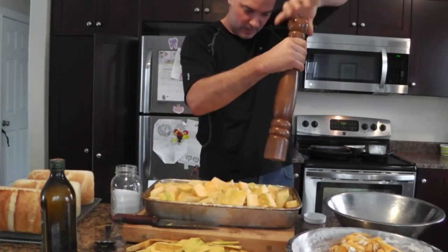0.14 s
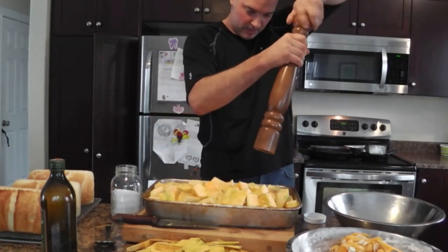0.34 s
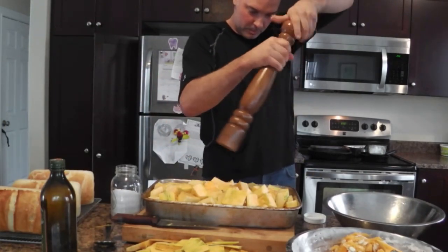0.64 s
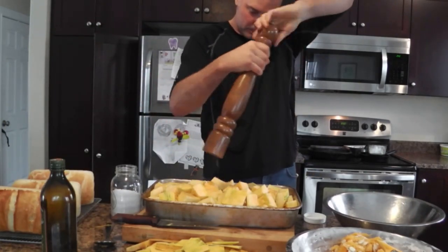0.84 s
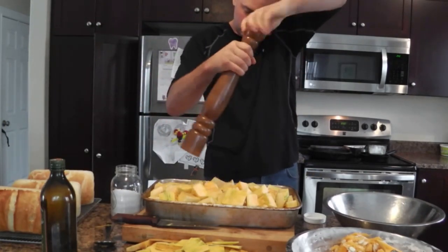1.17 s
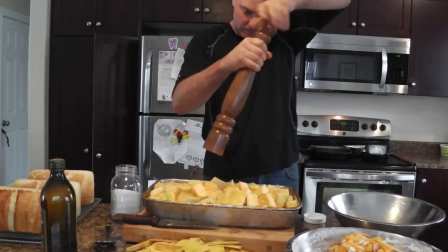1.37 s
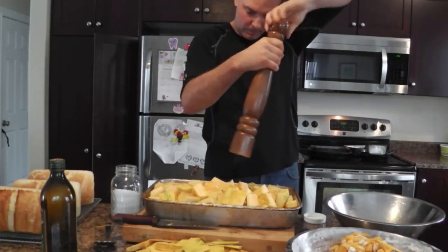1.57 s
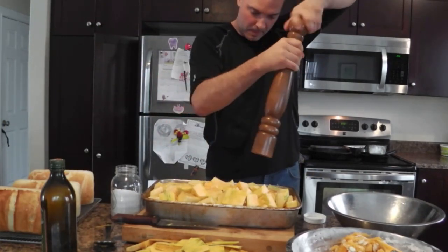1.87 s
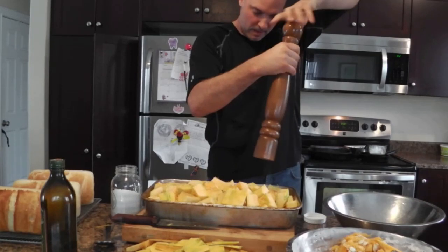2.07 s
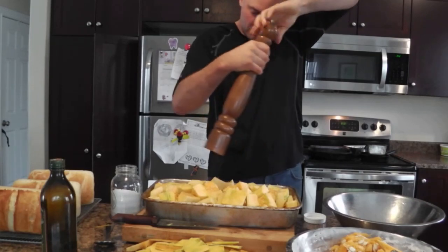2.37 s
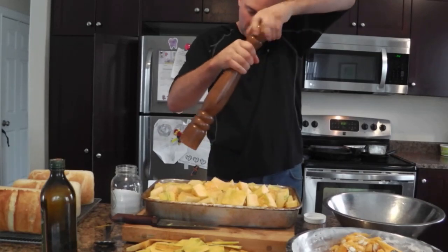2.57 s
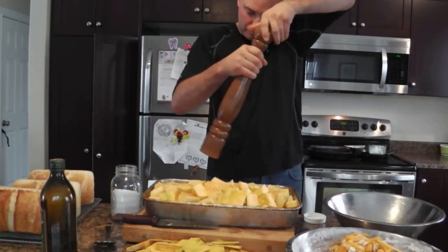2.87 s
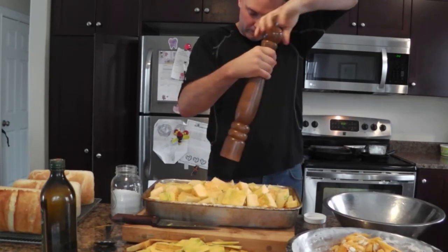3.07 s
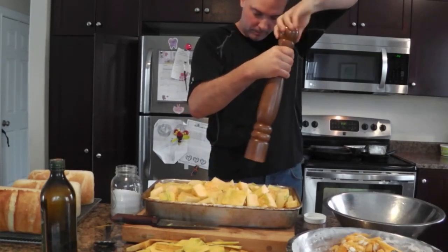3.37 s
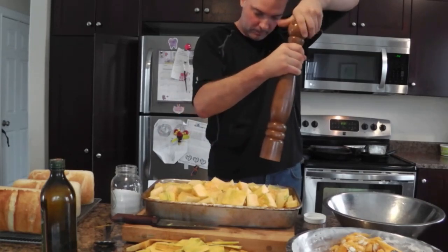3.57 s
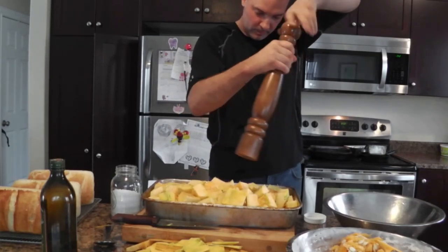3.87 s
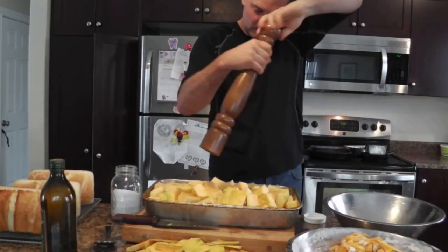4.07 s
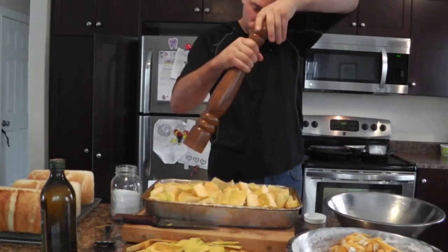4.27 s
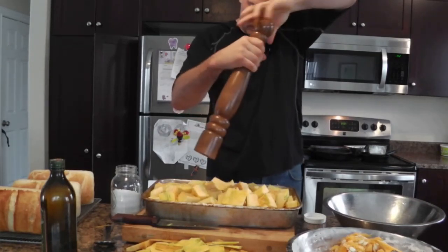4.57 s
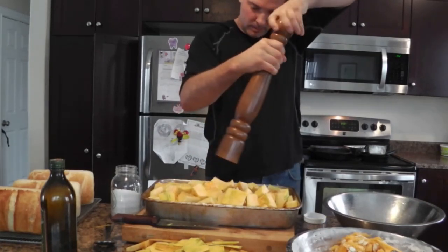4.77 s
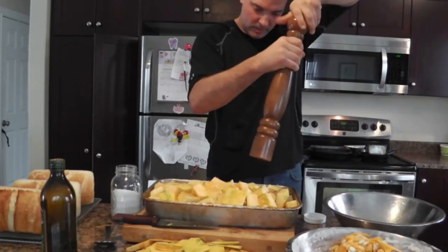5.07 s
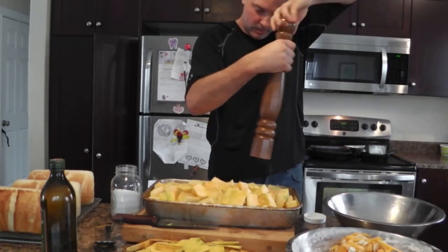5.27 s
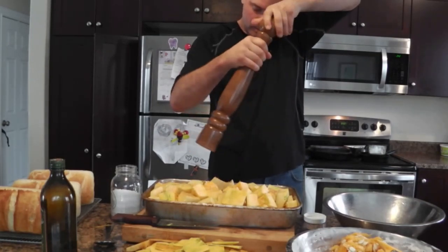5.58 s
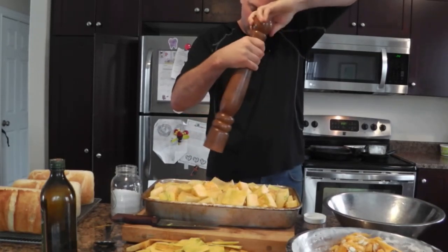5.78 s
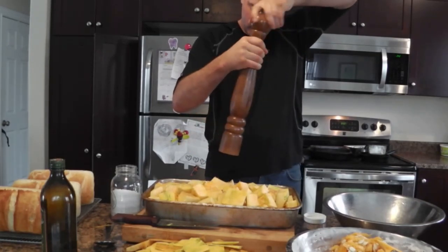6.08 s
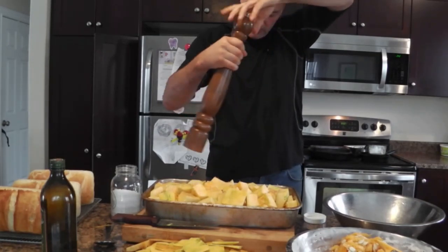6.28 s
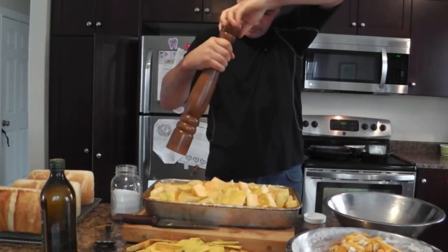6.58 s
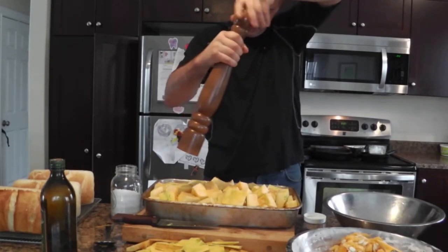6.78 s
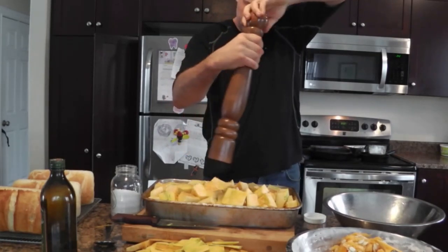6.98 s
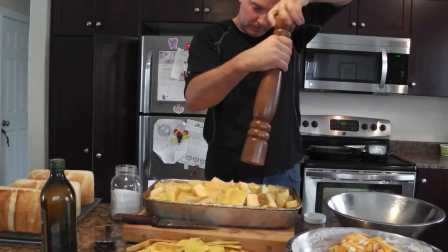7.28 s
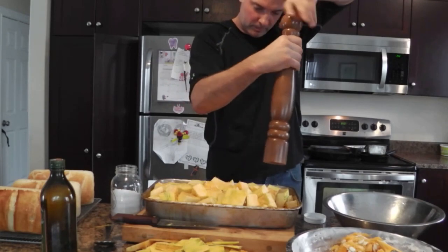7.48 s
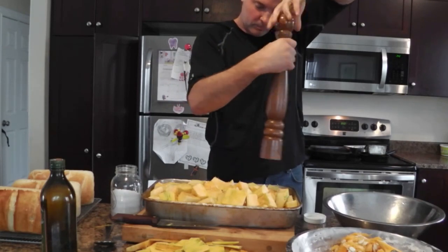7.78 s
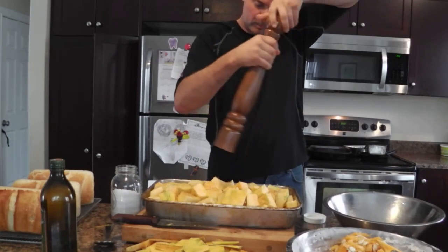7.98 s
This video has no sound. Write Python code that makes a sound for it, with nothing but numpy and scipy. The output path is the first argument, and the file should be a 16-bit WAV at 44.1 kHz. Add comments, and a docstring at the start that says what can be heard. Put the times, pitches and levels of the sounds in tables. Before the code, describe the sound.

For about eight seconds a tall wooden pepper mill is twisted by hand in a hard-surfaced kitchen. A twist begins at once, then others follow roughly every 0.35 to 0.4 seconds. Each opens with a faint scrape and soft knock, builds for under a tenth of a second into dense, gritty crunching coloured by the hollow barrel, then cuts off into a bright, smooth room ring. The first 2.7 seconds are strongest; around 2.9 to 4 the grinding softens, firms again at 4.7 to 5.1, weakens most near 6, then partly recovers. Sharp cracks and tiny high husk pings punctuate the twists. Dry knob creaks tick near 0.6, 1.3, 3.8, 4.9 and 7.4, with knocks around 0.6, 4.3 and 7.5. Loose corns rattle faintly. Quiet air and wavering low hum continue underneath, with a slight rumble swell near 4.8. The last twist starts just before the end.

```python
"""In a hard-walled kitchen a tall wooden pepper mill is twisted by hand, nearly three twists a second.
Each twist is a dense crunch of tiny random fractures, with sharp cracks, all ringing in the wooden barrel.
Splitting husks ping, the knob creaks in runs of dry ticks and knocks now and then, and loose corns rattle.
Decaying noise tails make the room ring on between twists, over a low appliance hum, air and rumble."""
import sys
import numpy as np
from scipy import signal
from scipy.fft import rfft, irfft, next_fast_len
from scipy.io import wavfile
from scipy.ndimage import uniform_filter1d, map_coordinates

SR = 44100
rng = np.random.default_rng(int(sys.argv[2]) if len(sys.argv) > 2 else 0)


def unload_wav(signal):
    """Save mono or channel-first audio to the path in sys.argv[1] as 16-bit WAV at rate SR, clipped to [-1, 1]."""
    wavfile.write(
        sys.argv[1],
        SR,
        np.round(np.clip(np.atleast_2d(signal).T, -1, 1) * 32767).astype(np.int16),
    )


N = 358533
TIME = np.arange(N) / SR  # s


def amp(db):
    """Decibels to gain."""
    return 10 ** (np.asarray(db) / 20)


def unit(x):
    """Scaled to rms 1."""
    return x / np.sqrt(np.mean(x ** 2) + 1e-20)


def along(points, hz):
    """(Hz, value) points read on a log frequency axis."""
    point_hz, value = np.transpose(points)
    return np.interp(np.log(hz + 1), np.log(point_hz), value)


def wobble(rate):
    """A smooth random curve, rate knots a second."""
    knots = rng.standard_normal(int(N * rate / SR) + 4)
    return map_coordinates(knots, [TIME * rate], order=2)


def filtered(x, response):
    """x times a gain that depends on frequency."""
    size = next_fast_len(x.shape[-1] + 4096)
    gain = response(np.fft.rfftfreq(size, 1 / SR))
    return irfft(rfft(x, size) * gain, size)[..., :x.shape[-1]]


def add(track, s, sound):
    """Mix a sound into a track from time s on."""
    part = track[..., max(round(s * SR), 0):][..., :sound.shape[-1]]
    part += sound[..., :part.shape[-1]]


def fractures(count, rate, spread_db):
    """Randomly timed impulses of very unequal size, rate a second."""
    chance, size = rng.random(count), rng.standard_normal(count)
    sign = rng.choice([-1, 1], count)
    return (chance < rate / SR) * sign * amp(spread_db * np.clip(size, -2, 2))


def burst(life, attack):
    """A gritty force of rms 1 without pitch: life is its 60 dB decay (s), attack its onset (s)."""
    t = TIME[:SR // 40]
    force = amp(-60 * t / life) * (1 - np.exp(-t / attack))
    spectrum = rfft(force * rng.standard_normal(len(t)), 2 * len(t))
    even = irfft(np.exp(1j * np.angle(spectrum)))[:len(t)]  # keep the phases, flatten the spectrum
    return unit(even)


# broad colour of a breaking corn heard through the mill: freq_hz, relative_level_db
CRUNCH_COLOUR = [(60, -44.5), (200, -24.5), (330, -14), (600, -13), (900, -7), (1300, -2.5), (1750, -6),
                 (2300, -3), (3000, -11.5), (5600, -14.5), (7000, -22), (9200, -28), (10800, -38.5),
                 (15500, -48.5)]
# resonances of barrel and burr: freq_hz, width_hz, peak_db (over the broad colour)
BARREL_MODES = [(500, 10, 6.5), (1120, 113, 6), (1260, 240, 2.5), (1460, 150, 2), (2148, 175, 5.5),
                (2295, 210, 2.5), (2485, 77, 9), (3680, 360, 3), (5310, 400, 4)]


def mill_ring(boom_db, crisp_db, boom_hz=1700, crisp_hz=2900, size=2048):
    """The mill's answer to one tiny fracture; the grip shifts its resonances a little each time."""
    hz = np.fft.rfftfreq(size, 1 / SR)
    grip = 1 + .009 * rng.standard_normal(len(BARREL_MODES))
    db = along(CRUNCH_COLOUR, hz)
    for (mode_hz, width_hz, peak_db), shift in zip(BARREL_MODES, grip):
        db = db + peak_db / (1 + (2 * (hz - mode_hz * shift) / width_hz) ** 2)
    boom = boom_db / (1 + (hz / boom_hz) ** 8)  # below boom_hz
    crisp = crisp_db * (1 - 1 / (1 + (hz / crisp_hz) ** 8))  # above crisp_hz
    gain = unit(amp(db)) * amp(boom + crisp)
    # minimum phase: the ring starts at once
    cepstrum = irfft(np.log(gain + 1e-6))
    causal = np.r_[1, np.full(size // 2 - 1, 2), np.zeros(size // 2)]
    return irfft(np.exp(rfft(cepstrum * causal)))


BITE_BOOM_DB, BITE_CRISP_DB = 5.5, 4.5  # colour of the first bite
CREST_BOOM_DB, CREST_CRISP_DB = -1.5, -1.5  # colour under full pressure
EASE_S, EASE_DB = .055, -9.5  # after its crest every twist eases off for so long, by so much
RELEASE_DB_PER_S, GRIP_S = 1100, 0.0058  # how fast the burr stops, and how fast it grips
# lesser corns that split during a twist: rate per second, level against the grind, crispness
SPLIT_RATE, SPLIT_DB, SPLIT_CRISP_DB = 45, -5.5, 5
# twists of the knob, levels before the mix: start_s, rise_s (to the crest), crest_db,
# bite_db (first bite against the crest), knock_db (burr catching, before its trim), boom_db, crisp_db
TWISTS = [(0.0, 0.0058, -19.5, -10, -8.5, -3.5, -5), (.32, 0.076, -20.5, -8.5, -34, .5, -5),
          (.695, 0.071, -20.5, -16.5, -18.5, -3, 0.5), (1.102, 0.07, -19, -9.5, -17, 1.5, -1),
          (1.465, 0.074, -18.5, -19.5, -19.5, 0, -3.5), (1.835, 0.074, -19.5, -13, -24, -2, -1),
          (2.217, 0.089, -23, -3, -18, -2, -4.5), (2.565, 0.049, -20.5, -15, -15, 1.5, -3.5),
          (2.904, 0.077, -26.5, -1, -18, 0, -2.5), (3.262, 0.084, -26.5, -8.5, -19.5, -2, 0),
          (3.627, 0.062, -27, -5, -24.5, 2.5, -1), (3.976, 0.059, -24.5, -2, -19, 0.5, 2.5),
          (4.369, 0.077, -23.5, -8, -19.5, -2, -2.5), (4.745, 0.11, -20.5, -5.5, -24, -2, -2),
          (5.117, .11, -20.5, -6, -17.5, -2.5, -2.5), (5.629, 0.083, -27.5, -6, -25, 3, -1),
          (6.069, .055, -32, -5, -17, -2, 1), (6.47, 0.088, -25, -11, -42, 1.5, -1.5),
          (6.865, 0.063, -23, -8.5, -16.5, -3.5, -1.5), (7.23, 0.076, -24, -5, -26.5, -1.5, -2),
          (7.59, 0.056, -22.5, -6.5, -25, -1, -3.5), (8.085, 0.021, -29, 4.5, -22.5, 0, 3.5)]


def grinding(clump_db=4):
    """The burr bites, builds to a crest and eases off; corns give way in clumps of tiny fractures."""
    out, t = np.zeros(N), TIME[:SR // 3]
    clumps = amp(clump_db * wobble(190))
    for s, rise, crest_db, bite_db, _, boom_db, crisp_db in TWISTS:
        effort_db = np.interp(t, [0, rise, rise + EASE_S], [bite_db, 0, EASE_DB])
        effort_db -= RELEASE_DB_PER_S * np.maximum(t - rise - EASE_S, 0)
        effort = amp(crest_db + effort_db) * (1 - np.exp(-t / GRIP_S))
        pressure = np.minimum(t / rise, 1)
        grains = fractures(count=len(t), rate=1600, spread_db=5.0)
        grains *= np.roll(clumps, -round(s * SR))[:len(t)]
        # even out the grains' running level, so the effort sets each twist's loudness
        running_power = np.abs(uniform_filter1d(grains ** 2, size=SR // 30))
        grains /= np.sqrt(running_power + 1e-9)
        split_times = fractures(count=len(t), rate=SPLIT_RATE, spread_db=2)
        splits = unit(signal.fftconvolve(split_times, burst(life=0.0029, attack=0.00043))[:len(t)])
        # the woody bite fades into the crest's crunch as the pressure grows
        bite_ring = mill_ring(boom_db + BITE_BOOM_DB, crisp_db + BITE_CRISP_DB)
        crest_ring = mill_ring(boom_db + CREST_BOOM_DB, crisp_db + CREST_CRISP_DB)
        split_ring = mill_ring(boom_db + CREST_BOOM_DB, crisp_db + SPLIT_CRISP_DB)
        woody = signal.fftconvolve((1 - pressure) * effort * grains, bite_ring)
        crunch = signal.fftconvolve(pressure * effort * grains, crest_ring)
        crackle = signal.fftconvolve(pressure * effort * splits, split_ring)
        add(out, s, woody + crunch + amp(SPLIT_DB) * crackle)
    return out


LEAD_S, LEAD_DB = .012, -5  # slack taken up before a twist: time, level against the first bite
CATCH_BOOM_DB, CATCH_CRISP_DB = 3.5, -3.5  # colour of the knock that opens a twist


def catching():
    """Each twist opens with a faint scrape of slack, then a soft woody knock of burr against corns."""
    out, t = np.zeros(N), TIME[:SR // 30]
    for s, _, crest_db, bite_db, knock_db, boom_db, _ in TWISTS:
        scrape = rng.standard_normal(len(t)) * np.interp(t, [0, LEAD_S, 2 * LEAD_S], [0, 1, 0])
        scrape = signal.fftconvolve(scrape, mill_ring(BITE_BOOM_DB, BITE_CRISP_DB))
        add(out, s - LEAD_S, amp(crest_db + bite_db + LEAD_DB) * scrape)
        knock = burst(life=0.017, attack=0.0016)
        knock = signal.fftconvolve(knock, mill_ring(boom_db + CATCH_BOOM_DB, CATCH_CRISP_DB))
        add(out, s, amp(knock_db - 10.5) * knock)
    return out


# whole corns that split: start_s, level_db (before the trim), boom_db, crisp_db
CRACKS = [(.013, -10.5, 2, 3), (0.738, -16.5, 3, 3), (.741, -9, 0, -11), (1.124, -11, -3.5, 0),
          (1.156, -13, -4, 7.5), (1.171, -8, -16, -4.5), (1.504, -25, -30, 13), (1.859, -22, 8, 10),
          (1.88, -13.5, -1, 1), (1.974, -17, -1, 5.5), (2.279, -26.5, 7, 13), (2.566, -10.5, -17, -3),
          (2.577, -10.5, 0, 0.5), (2.98, -15, 0, 9), (3.297, -12, -1, 5.5), (3.313, -16.5, 3.5, 2.5),
          (3.705, -8.5, -15, -16), (4.022, -10, -4, -8), (4.41, -18, 4, 5), (4.746, -28, 11, 14.5),
          (4.817, -14.5, -10, 6.5), (5.216, -15, -7, 3), (5.643, -14.5, -2.5, -8), (6.084, -15.5, -8, -7),
          (6.122, -25, 5.5, 7), (6.865, -16, 2.5, 2.5), (6.936, -17.5, 3, -12), (7.653, -11.5, -3, 4),
          (7.666, -14, 0.5, 8)]
# the slack knob knocks between twists: start_s, level_db (before the trim), boom_db, crisp_db
KNOCKS = [(.625, -27, -0.5, -9), (4.322, -39, 1, 7), (7.511, -20, -8.5, -10.5)]


def striking(blows):
    """A splitting corn or a knock of the knob is a burst of a few milliseconds that rings the barrel."""
    out = np.zeros(N)
    for s, db, boom_db, crisp_db in blows:
        blow = burst(life=0.012, attack=0.0011)
        add(out, s, amp(db) * signal.fftconvolve(blow, mill_ring(boom_db, crisp_db)))
    return amp(-9.0) * out


SNAP_HZ, SNAP_SCATTER = 4820, 0.057  # a husk's ping: centre pitch, its spread as a log ratio
SNAP_DB = -5.5  # trim on level plus crispness of the crack
SNAP_COLOUR = [(200, -32), (1000, -31), (3000, -2.5), (5500, -0.5), (7000, -22), (14000, -22)]  # Hz, dB


def snapping(life=0.0083, attack=0.00038, grit=1.0):
    """A snapping husk flicks a steel tooth: a short gritty ping from the mill's open mouth, one a crack."""
    out, t = np.zeros(N), TIME[:SR // 80]
    for s, db, _, crisp_db in CRACKS:
        hz = SNAP_HZ * np.exp(SNAP_SCATTER * rng.standard_normal())
        jitter = np.cumsum(0.22 * rng.standard_normal(len(t)))  # rad
        ping = np.sin(2 * np.pi * hz * t + jitter)
        envelope = amp(db + crisp_db - 60 * t / life) * (1 - np.exp(-t / attack))
        add(out, s, envelope * (ping + grit * rng.standard_normal(len(t))))
    return amp(SNAP_DB) * filtered(out, lambda hz: amp(along(SNAP_COLOUR, hz)))


# the knob creaks on its seat as the hand regrips: start_s, length_s, level_db (before the trim)
CREAKS = [(.577, 0.11, -36), (1.301, .094, -37), (3.77, 0.12, -39), (4.131, .21, -39), (4.87, 0.17, -31.5),
          (7.37, 0.078, -33.5), (7.52, .03, -28), (7.878, 0.15, -41)]


def creaking(slips=130, spread_db=5.0, creak_hz=2400, life=0.0077, fade_db=7):
    """Wood sticks and slips on wood: uneven, fading dry ticks, about slips a second, near creak_hz."""
    out, t = np.zeros(N), TIME[:SR // 80]
    envelope = amp(-60 * t / life) * (1 - np.exp(-t / 0.00093))
    for start, length, db in CREAKS:
        gaps = rng.uniform(.4, 1.6, 60)
        sizes, pitches = rng.standard_normal(60), rng.standard_normal(60)
        ages = (np.cumsum(gaps) - gaps[0]) / slips
        for age, size, pitch in zip(ages, sizes, pitches):
            if age < length:
                tick = np.sin(2 * np.pi * creak_hz * (1 + 0.051 * pitch) * t) * envelope
                tick_db = db + spread_db * size - fade_db * age / length
                add(out, start + age, amp(tick_db) * tick)
    return amp(14.0) * out


def rattling():
    """Loose corns and the slack knob tick against the barrel, louder around the harder twists."""
    start, _, crest_db, *_ = np.transpose(TWISTS)
    ticks = fractures(count=N, rate=58, spread_db=5) * amp(np.interp(TIME, start, crest_db))
    return amp(-55.5) * unit(signal.fftconvolve(ticks, mill_ring(boom_db=-1.0, crisp_db=2.0))[:N])


def counter(x, count=6):
    """The direct sound and its first bounces off the counter and the dishes."""
    paths = np.zeros((2, SR // 40))
    paths[:, 0] = 1
    delays = rng.uniform(.002, .016, count)  # s
    for delay, sign in zip(delays, rng.choice([-1, 1], count)):
        paths[:, round(delay * SR)] += sign * amp(-12.0)
    return signal.oaconvolve(x[None], paths, axes=1)[:, :N]


# diffuse sound at the close microphone pair: freq_hz, side_gain_db
WIDTH = [(100, -6.5), (380, -9), (700, -15), (1300, -17.5), (2400, -10), (4400, -4), (8000, 1.5),
         (15000, 3.5)]


def stereo(mid, side):
    """Diffuse sound at the microphone pair: alike in the middle range, unrelated in the treble."""
    side = filtered(side, lambda hz: amp(along(WIDTH, hz)))
    return np.array([mid + side, mid - side])


# how long the kitchen rings: freq_hz, t60_s
KITCHEN_DECAY = [(200, 0.15), (600, 0.71), (1400, 0.75), (3700, 0.86), (10000, 0.53)]


def kitchen(x, build_up=0.0026, count=6):
    """Dense echoes of the hard walls: several noise tails take turns, so the ring stays smooth and untuned."""
    out = np.zeros((2, N))
    for k in range(count):
        hz, t, bands = signal.stft(rng.standard_normal((2, SR * 3 // 4)), SR, nperseg=256)
        t60 = along(KITCHEN_DECAY, hz)[:, None]
        decay = amp(-60 * t / t60) * (1 - np.exp(-t / build_up)) / np.sqrt(t60)
        tail = signal.istft(bands * decay, SR)[1]
        echoes = stereo(*tail / np.linalg.norm(tail[0]))
        # 55 turns a second, each overlapping its neighbours
        place = (TIME * 55 - k) % count
        share = np.sin(np.pi / 2 * np.minimum(place, 2))
        out += signal.oaconvolve((share * x)[None], echoes, axes=1)[:, :N]
    return out


# colour of the room noise: freq_hz, relative_level_db
AIR_COLOUR = [(15, -20), (30, -3.5), (50, -15.5), (120, 4), (220, -7), (400, -6.5), (1000, -8),
              (4000, -19.5), (15000, -39)]
# course of the rumble, before its left and right trims: time_s, level_db
RUMBLE_LEVEL = [(0, -56), (3.8, -59.5), (4.8, -48), (5.4, -50.5), (5.9, -58), (8.1, -55)]
RUMBLE_COLOUR = [(12, -20), (32, -6), (50, -3), (90, -3.0), (170, -7), (500, -90)]  # Hz, relative dB


def background():
    """Steady room noise, an appliance's wavering hum and a faint rumble that swells past the middle."""
    air = unit(filtered(rng.standard_normal((2, N)), lambda hz: amp(along(AIR_COLOUR, hz))))
    hum_level = amp(-66.5 + 3.8 * wobble(7.1))
    hum = hum_level * np.sin(2 * np.pi * 109 * TIME + 1.2 * wobble(6.6))
    low = unit(filtered(rng.standard_normal((2, N)), lambda hz: amp(along(RUMBLE_COLOUR, hz))))
    swell = amp(np.interp(TIME, *np.transpose(RUMBLE_LEVEL)))
    rumble = swell * stereo(*low) * amp([[-7], [-2]])  # stronger on the right
    return hum + amp(-49.0) * stereo(*air) + rumble


def scene():
    """The mill stands straight ahead, far enough for the room to outweigh its direct sound."""
    mill = catching() + grinding() + striking(CRACKS) + rattling()
    ticks = snapping() + creaking() + striking(KNOCKS)  # beamed forward, so they excite the room less
    direct = counter(amp(-7.0) * mill + ticks)
    room = amp(-1.26) * kitchen(mill + amp(-2) * ticks)
    return direct + room + background()


# balance of the microphone pair: freq_hz, left_minus_right_db
LEAN = [(100, -1.5), (300, -0.5), (1200, 0), (2200, 0.6), (4400, 1.6), (8000, -0.5), (14000, -.7)]
TOP_HZ = 15700  # band limit


def record(dry):
    """The two microphones differ a little in tone; a narrow treble notch and a band limit shape both."""
    def response(hz):
        notch = 1 - .8 / (1 + ((hz - 7860) / 60) ** 2)
        lean = amp(np.outer([.5, -.5], along(LEAN, hz)))
        return lean * notch * (hz < TOP_HZ)
    return filtered(dry, response)


dry = scene()
out = record(dry)
unload_wav(out)
```